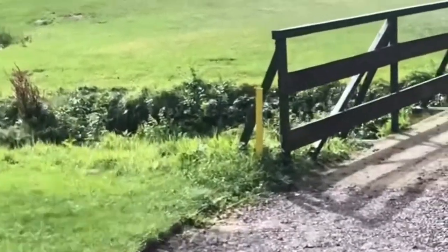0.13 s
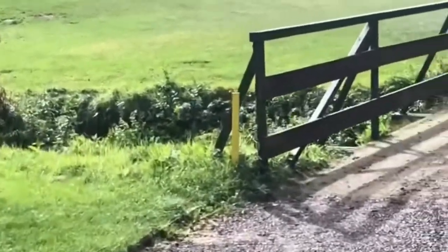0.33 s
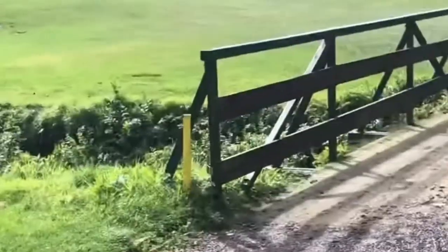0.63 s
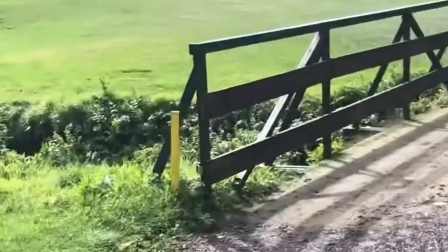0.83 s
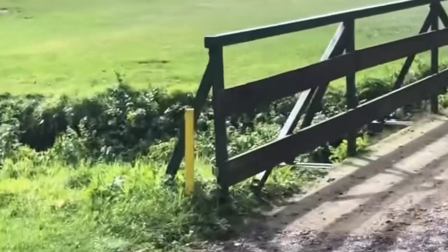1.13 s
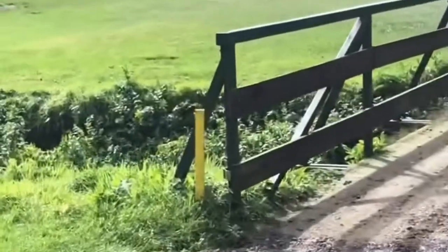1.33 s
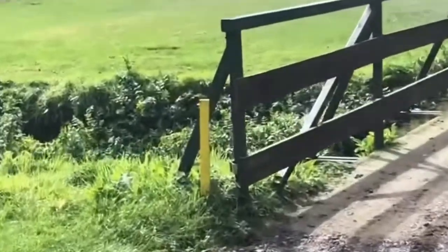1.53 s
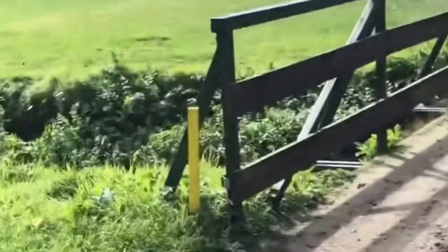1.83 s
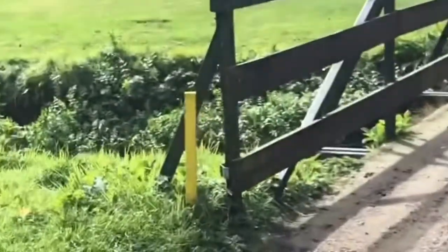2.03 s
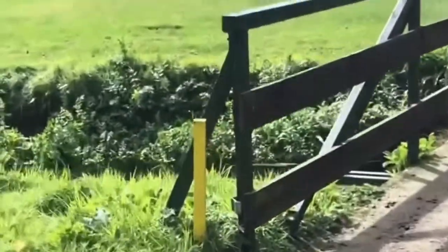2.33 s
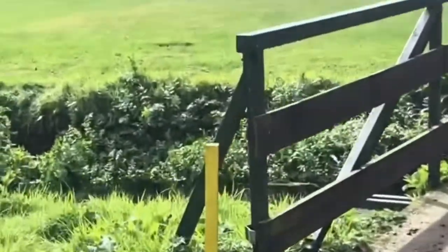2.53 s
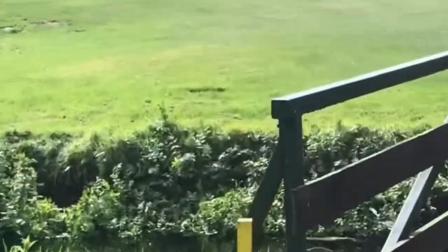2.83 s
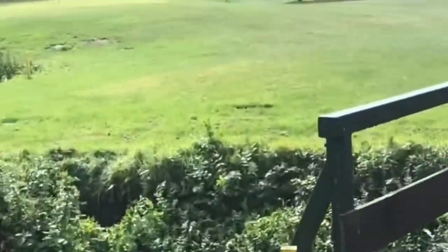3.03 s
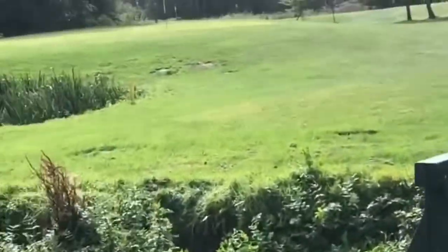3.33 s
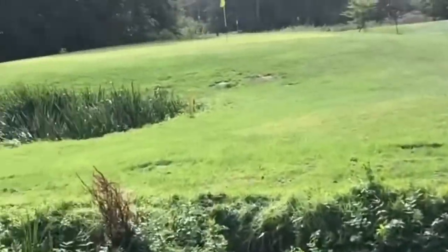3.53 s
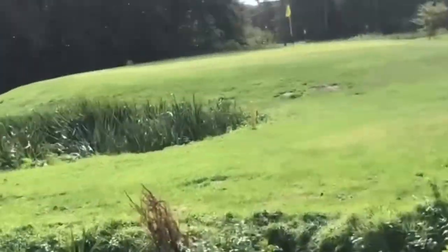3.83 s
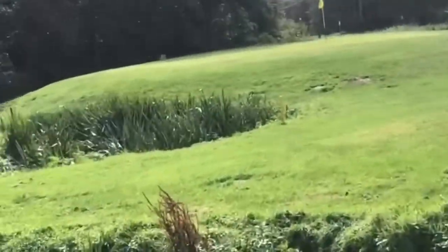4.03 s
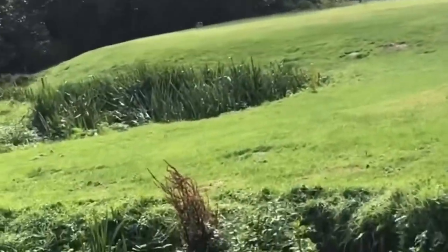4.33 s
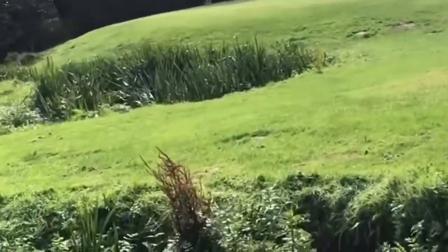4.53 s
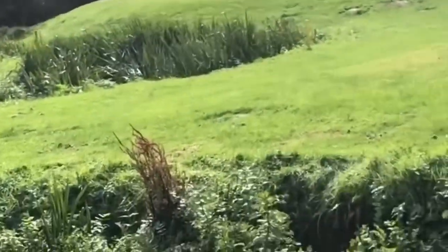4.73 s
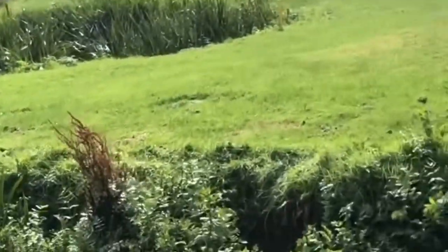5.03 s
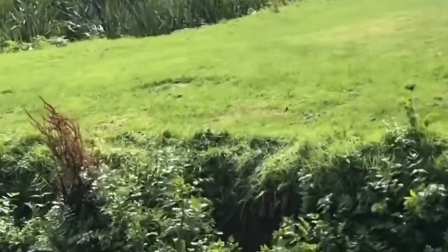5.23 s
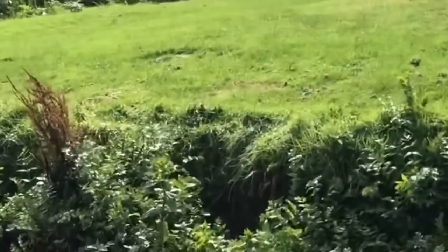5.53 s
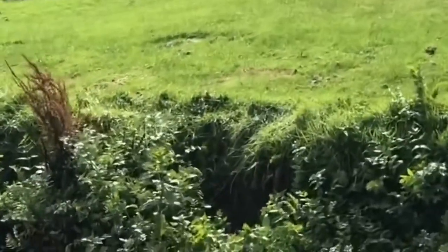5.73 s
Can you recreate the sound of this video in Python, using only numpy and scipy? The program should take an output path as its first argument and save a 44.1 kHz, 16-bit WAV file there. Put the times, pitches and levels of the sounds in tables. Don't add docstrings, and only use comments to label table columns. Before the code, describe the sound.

Outdoors on a gravel path beside grass, footsteps are heard close and dry through a handheld phone. From 0 to 0.7 s there are light scuffs, small clicks and soft sole thuds. Sharp stone cracks stand out around 0.8, 1.1 and 1.4 s, each with a bright snap and a little trickling grit. From 1.8 to 3.2 s the crunching becomes dense and loud, with overlapping snaps, scrapes and low heel knocks, peaking near 2.9 s together with a deep wind thump. From 3.3 to 4.1 s it thins to faint ticks and scuffs. A firm, heavy step lands around 4.2-4.4 s, another lighter cluster follows at 4.7-5.1 s, then only sparse clicks, one crisp crack at 5.6 s. Low rumble and handling bumps run throughout, strongest near 4.9 and 5.4-5.5 s, over a faint airy hiss with no obvious echo.

```python
import sys
import numpy as np
from scipy import signal
from scipy.fft import rfft, irfft, next_fast_len
from scipy.io import wavfile
from scipy.ndimage import uniform_filter1d

SR = 44100
rng = np.random.default_rng(int(sys.argv[2]) if len(sys.argv) > 2 else 0)


def attenuation_scalar(level_db):
    decades = np.asarray(level_db, float) / 20
    return 10 ** decades


def master_out(mix):
    frames = np.transpose(np.atleast_2d(mix))
    ceiling = np.clip(frames, -1, 1)
    pcm = np.round(ceiling * 32767).astype(np.int16)
    wavfile.write(sys.argv[1], SR, pcm)


N = 259431

# [f/Hz, width/Hz, level/dB]
DULL_RINGS = [(2423, 190, 9), (3700, 730, 8), (3130, 450, 0.5)]
# [f/Hz, width/Hz, level/dB]
BRIGHT_RINGS = [(5810, 840, 6.5), (7500, 260, 7.5), (8500, 2800, 8), (10000, 3500, 1.5),
                (13800, 3000, -7.5)]
# [f/Hz, width/Hz, level/dB]
SOLE_RINGS = [(918, 64, 8.5), (1140, 163, 8), (1630, 710, 1), (1838, 156, 7), (2220, 3350, -10),
              (687, 240, 1)]
CHIP_GRIT_DB, GRIND_GRIT_DB = -13, -9
HEEL_SCRAPE_DB = -16


def evened(x):
    return x / np.sqrt(np.mean(x ** 2) + 1e-20)


def column(table, count):
    rows = np.array(table, float)
    return np.interp(np.arange(N) / SR, rows[:, 0], rows[:, count])


def add(mix, s, sound):
    part = mix[round(s * SR):][:len(sound)]
    part += sound[:len(part)]


def ring(x, modes):
    out = np.zeros(len(x))
    for k, (hz, width, db) in enumerate(modes):
        b, a = signal.iirpeak(hz, hz / max(width, 10), SR)
        out += (-1) ** k * attenuation_scalar(db) * signal.lfilter(b, a, x)
    return out


def varied(modes, detune, spread_db):
    chance = rng.standard_normal((len(modes), 2))
    return [(hz * (1 + detune * u), width, db + spread_db * v)
            for (hz, width, db), (u, v) in zip(modes, chance)]


def struck_at(modes, hz, lift_db):
    near = np.argmin([abs(np.log(mode[0] / hz)) for mode in modes])
    struck = list(modes)
    _, width, db = modes[near]
    struck[near] = (hz, min(width, 0.14 * hz), db + lift_db)
    return struck


def coloured(points):
    f, db = np.transpose(points)
    size = next_fast_len(N)
    hz = np.fft.rfftfreq(size, 1 / SR)
    gain = attenuation_scalar(np.interp(np.log(hz + 1), np.log(f + 1), db))
    return evened(irfft(rfft(rng.standard_normal(size)) * gain, size)[:N])


def lumps(seconds):
    size = max(round(seconds * SR), 1)
    once = uniform_filter1d(rng.standard_normal(N), size)
    return evened(uniform_filter1d(once, size))


def slips(per_s, spread_db, decay_s):
    happens = rng.exponential(1, N), rng.random(N) < per_s / SR
    size = attenuation_scalar(spread_db * np.minimum(happens[0], 4)) * happens[1]
    energy = signal.lfilter([1], [1, -np.exp(-1 / (decay_s * SR))], size ** 2)
    return evened(np.sqrt(energy))


def snap(db, hz, bright_db, grit_db, second_hz):
    t = np.arange(2200) / SR
    crack, grit, flicker = rng.standard_normal((3, len(t)))
    crack = .36 * crack * np.exp(-t / .001)
    crack[8] += 1.8
    trickle = attenuation_scalar(2.7 * evened(uniform_filter1d(flicker, size=60)))
    trickle = trickle * np.exp(-t / 0.0065) * np.minimum(t / 0.002, 1)

    rings = varied(DULL_RINGS + BRIGHT_RINGS, detune=0.039, spread_db=2.5 if second_hz else 4.0)
    rings = struck_at(rings, hz, lift_db=11.5)
    if second_hz:
        rings = struck_at(rings, second_hz, lift_db=9.0)

    def sounded(modes, lag, power):
        struck = ring(np.roll(crack, lag), modes)
        struck = struck / np.sqrt(np.mean(struck[:110] ** 2))
        return np.sqrt(power) * (struck + attenuation_scalar(grit_db + 7.5) * trickle * evened(ring(grit, modes)))

    share = 1 / (1 + attenuation_scalar(-2 * bright_db))
    dull = sounded(rings[:len(DULL_RINGS)], 14, 1 - share)
    bright = sounded(rings[len(DULL_RINGS):], 0, share)
    rubbed = attenuation_scalar(grit_db + 5.5) * trickle * evened(ring(grit, SOLE_RINGS))
    return attenuation_scalar(db - 7.0) * (bright - dull + rubbed)


def stone(out_db, hz, grit_db):
    bright_db = 7.5 * np.log2(hz / 4140)
    return snap(out_db, hz, bright_db, grit_db, None)


def knock(db, hz, scrape_db, length):
    t = np.arange(round((length + .05) * SR)) / SR
    release = np.exp(-np.maximum(t - 0.45 * length, 0) / (0.0039 + 0.56 * length))
    press = np.minimum(t / 0.0011, 1) * release
    shove, rub = rng.standard_normal((2, len(t))) * press
    contact = round(.002 * SR)
    shove[contact] += 18
    rub[contact] += 8
    push = ring(ring(shove, [(hz, 100, 0)]), [(hz, 260, 0)])
    scrape = ring(rub, varied(SOLE_RINGS, detune=0.0043, spread_db=2.0))
    loud = t < length + .004
    push = push / np.sqrt(np.mean(push[loud] ** 2))
    scrape = scrape / np.sqrt(np.mean(scrape[loud] ** 2))
    share = 1 / (1 + attenuation_scalar(-2 * scrape_db))
    return attenuation_scalar(db - 8.0) * (np.sqrt(1 - share) * push + np.sqrt(share) * scrape)


def rustle(db, hz, length):
    t = np.arange(round((length + 0.024) * SR)) / SR
    spray = np.minimum(t / 0.0015, 1) * np.exp(-np.maximum(t - length, 0) / 0.0045)
    rings = struck_at(SOLE_RINGS + DULL_RINGS + BRIGHT_RINGS, hz, lift_db=12.0)
    return attenuation_scalar(db - 3.5) * spray * evened(ring(rng.standard_normal(len(t)), rings))


def nudge(db, hz, length):
    t = np.arange(round((length + 0.036) * SR)) / SR
    press = np.minimum(t / 0.003, 1) * np.exp(-np.maximum(t - length / 2, 0) / (0.0023 + length / 2))
    rub = rng.standard_normal(len(t)) * press
    rub[round(.001 * SR)] += 8
    rung = ring(rub, struck_at(SOLE_RINGS, hz, lift_db=13.0))
    return attenuation_scalar(db - 7.5) * rung / np.sqrt(np.mean(rung[t < length + .002] ** 2))


def steps():
    # [t/s, level/dB, strongest f/Hz, second f/Hz, grit level/dB]
    cracks = [(0.191, -16, 7250, 8900, -28), (0.7973, -7, 3500, 8650, -26), (1.1419, -6.5, 5400, 2500, -29),
              (1.366, -1.5, 3720, 5940, -28), (1.832, -13, 3830, 8600, -16),
              (1.8552, -9.5, 2560, 10600, -15), (1.89, -8, 3700, 5900, -30), (2.0402, -16, 7500, 2170, -25),
              (2.19, -19.5, 5800, 3700, -7.5), (2.215, -11, 8600, 2470, -22),
              (2.2214, -9.5, 3640, 2540, -24), (2.3038, -2.5, 5080, 8600, -30),
              (2.3244, -10.5, 3840, 4900, -15.5), (2.3605, -9, 3400, 11300, -11),
              (2.5576, -2, 3700, 8240, -23), (2.633, -20.5, 1880, 5900, -5.5),
              (2.8057, -6, 3730, 4960, -13.5), (2.854, -5.5, 5700, 7500, -22),
              (2.887, -0.5, 8330, 2500, -26), (2.8978, -1, 7150, 2540, -27),
              (2.991, -11.5, 2430, 3520, -18), (3.022, -12, 3600, 8600, -24), (3.066, -2, 5160, 3630, -28),
              (3.128, -15, 3540, 5800, -18), (3.2194, -15, 3680, 8200, -11), (4.3991, -7, 8500, 3180, -18),
              (4.863, -9.5, 2460, 3280, -23), (5.0296, -11, 3320, 8000, -17.5),
              (5.0416, -11, 3650, 3080, -22), (5.6003, -6.5, 3680, 5260, -19.5)]
    crack_bright = [18, 1.5, 4.5, -4, -1, 3.5, -2, 10, 4, -6, -8, 8.5, -3, 2, 1, 3, -4, 7, 5, 7.5, -8, -5,
                    3, -2, -1, 1.5, 1, -2, -13, -6.5]
    # [t/s, level/dB, strongest f/Hz]
    chips = [(0.0645, -18, 8000), (0.2244, -28, 4870), (0.3148, -18.5, 7950), (0.4365, -24.5, 6040),
             (0.535, -16.5, 8100), (0.7348, -23, 3700), (0.888, -20, 11400), (1.012, -21, 6900),
             (1.039, -24.5, 3250), (1.1759, -23.5, 9200), (1.4147, -20, 7494), (1.5757, -28.5, 6030),
             (1.8804, -23, 7280), (2.025, -18.5, 7000), (2.818, -14, 7150), (2.8815, -22, 8100),
             (3.0804, -17, 3400), (3.149, -24, 8600), (3.343, -17.5, 5750), (3.7018, -26, 9250),
             (3.7552, -20, 3400), (3.9128, -20, 8700), (4.1874, -21.5, 2030), (4.2117, -18, 3600),
             (4.254, -20.5, 3260), (4.5772, -17, 7370), (4.8312, -16.5, 3720), (4.8703, -18.5, 8500),
             (5.0689, -18, 3600), (5.2231, -21.5, 2580)]
    # [t/s, level/dB, strongest f/Hz]
    strays = [(0.219, -22, 8000), (0.257, -29.5, 5460), (0.289, -49, 6460), (0.69, -36, 7500),
              (0.705, -34, 6460), (1.501, -25, 8500), (1.645, -29, 7500), (1.698, -34, 7500),
              (2.0368, -20, 6340), (2.418, -40, 7500), (3.0325, -17, 3520), (3.957, -25.5, 3600),
              (4.155, -40, 7000), (4.4045, -14, 3200), (5.355, -28, 6540), (5.377, -35, 8000),
              (5.65, -31, 7500)]
    # [t/s, level/dB, strongest f/Hz]
    grinds = [(0.0242, -28, 8500), (0.0384, -21, 8700), (0.1366, -19, 7540), (0.178, -18.5, 2700),
              (0.3448, -22, 2030), (0.5273, -25.5, 6600), (0.6349, -19.5, 7050), (0.8584, -24, 6360),
              (1.0006, -24, 1870), (1.092, -19.5, 3480), (1.4916, -22, 2920), (1.805, -20, 6050),
              (1.986, -18, 7900), (2.0012, -22.5, 2400), (2.1422, -24, 5760), (2.3394, -18, 3670),
              (2.4864, -21, 8100), (2.7129, -16, 6900), (2.9162, -15, 8150), (3.0409, -17.5, 3200),
              (3.3246, -35, 8500), (3.4061, -27.5, 3770), (3.4344, -26, 3630), (3.645, -25, 7100),
              (3.845, -30.5, 3320), (4.015, -24.5, 5860), (4.3479, -17, 7700), (4.8236, -22.5, 3650),
              (5.1495, -22.5, 6800), (5.735, -24, 2780)]
    # [t/s, level/dB, centre f/Hz, length/s]
    rustles = [(0.146, -25, 4140, 0.0021), (0.604, -25.5, 4200, 0.0016), (1.199, -28, 10000, 0.0058),
               (1.212, -34, 6500, 0.00072), (1.275, -28, 3400, 0.0012), (1.374, -24, 3800, 0.0014),
               (1.435, -30, 3740, 0.001), (1.466, -29.5, 8500, 0.0013), (1.717, -27.5, 8070, 0.004),
               (1.75, -28.5, 8150, 0.0022), (1.782, -29, 7100, 0.0046), (2.106, -28.5, 8500, 0.0067),
               (2.113, -24.5, 7920, 0.004), (2.303, -41, 2200, 0.0032), (2.372, -25, 6260, 0.0046),
               (2.451, -31, 2200, 0.017), (2.466, -24, 3550, 0.0013), (2.516, -29, 3800, 0.0092),
               (2.568, -24, 3600, 0.0038), (2.599, -26.5, 2200, 0.007), (2.622, -23.5, 7960, 0.0082),
               (2.775, -26, 2130, 0.0027), (3.208, -23, 7830, 0.0046), (3.353, -44, 5100, 0.0019),
               (3.947, -33, 5030, 0.0018), (4.302, -27, 1960, 0.0051), (4.359, -29, 2220, 0.019),
               (4.755, -29, 5170, 0.0015), (4.873, -42, 8400, 0.0014), (4.937, -27.5, 2180, 0.0082)]
    # [t/s, level/dB, knock f/Hz, length/s]
    thuds = [(0.017, -27.5, 268, 0.063), (0.104, -24.5, 317, 0.012), (0.604, -26, 400, 0.04),
             (0.618, -22.5, 190, 0.02), (0.681, -21.5, 273, 0.012), (0.765, -25.5, 377, 0.014),
             (0.831, -21.5, 370, 0.022), (1.043, -20.5, 396, 0.0079), (2.021, -23.5, 287, 0.026),
             (2.369, -18.5, 208, 0.014), (2.829, -13, 256, 0.0066), (3.402, -21.5, 312, 0.012),
             (3.978, -17, 366, 0.0074), (4.195, -24, 420, 0.038), (4.251, -16, 370, .0097),
             (4.356, -10, 264, 0.011), (4.389, -20.5, 246, 0.019), (4.738, -23.5, 205, 0.022),
             (4.909, -18, 260, 0.0089), (5.475, -27, 239, 0.029)]
    # [t/s, level/dB, knock f/Hz, length/s]
    heels = [
        (0.385, -20, 370, 0.0067),
        (1.754, -20.5, 294, 0.0065),
        (1.853, -23, 240, 0.038),
        (2.717, -27, 367, 0.0079),
        (2.891, -22, 193, 0.036),
        (2.909, -16, 184, 0.017),
        (3.593, -27.5, 367, 0.014),
        (5.493, -18.5, 192, 0.0098),
    ]
    # [t/s, level/dB, length/s]
    scrapes = [(0.123, -22.5, 0.027), (0.441, -43, 0.0092), (0.524, -28.5, 0.033), (1.377, -23, 0.0092),
               (1.788, -21, 0.013), (1.826, -26, 0.043), (1.925, -27.5, 0.012), (2.232, -23, 0.0089),
               (2.509, -34, 0.038), (2.592, -22.5, 0.041), (2.772, -21.5, .011), (2.813, -18, 0.017),
               (3.128, -26.5, 0.024), (3.217, -21.5, .015), (4.012, -25, 0.013), (4.068, -26, 0.014),
               (4.297, -21.5, 0.012), (4.573, -25.5, 0.0084), (4.691, -24.5, 0.025), (4.823, -19.5, .011),
               (5.272, -44, 0.021)]

    out = np.zeros(N)
    for (s, db, hz, second_hz, grit_db), bright_db in zip(cracks, crack_bright):
        late, weak = rng.random(2)
        add(out, s - .0005, snap(db, hz, bright_db, grit_db, second_hz))
        rebound = stone(db - 21 - 6 * weak, 3400, -13)
        add(out, s + 0.005 * (1.1 + 0.73 * late), rebound)
    for table, grit_db in ((chips, CHIP_GRIT_DB), (strays, CHIP_GRIT_DB), (grinds, GRIND_GRIT_DB)):
        for s, db, hz in table:
            add(out, s - .0003, stone(db, hz, grit_db))
    for s, *row in rustles:
        add(out, s, rustle(*row))
    for table, scrape_db in ((thuds, -5.5), (heels, HEEL_SCRAPE_DB)):
        for s, db, hz, length in table:
            add(out, s - .002, knock(db, hz, scrape_db, length))
    for s, db, length in scrapes:
        add(out, s - .002, knock(db, hz=273, scrape_db=6, length=length))
    return out


def pebbles():
    # [t/s, level/dB, strongest f/Hz]
    pebble_ticks = [(0.0248, -21, 8500), (0.1257, -16, 7600), (0.201, -27, 4640), (0.287, -30, 8480),
                    (0.3817, -28, 3340), (0.403, -40, 2450), (0.4865, -25, 6500), (0.627, -22, 1960),
                    (0.6708, -23.5, 2000), (0.7018, -25, 7660), (0.758, -25, 1810), (0.8006, -24, 2430),
                    (0.8145, -35, 3600), (1.0686, -23.5, 7360), (1.1453, -14.5, 3100), (1.211, -22, 6290),
                    (1.3793, -29, 3820), (1.4348, -23, 3680), (1.767, -26, 2670), (1.801, -22, 5580),
                    (1.829, -25, 1810), (1.88, -29, 7240), (1.9796, -24, 3800), (1.9842, -22, 3290),
                    (2.1645, -19, 2000), (2.1843, -20, 3400), (2.1903, -15, 5810), (2.2217, -10, 3630),
                    (2.2372, -13.5, 1910), (2.289, -26, 2000), (2.3603, -13, 3100), (2.448, -19, 1850),
                    (2.4703, -28, 8000), (2.5424, -22, 2560), (2.633, -20, 1810), (2.702, -30, 2500),
                    (2.709, -23, 2550), (2.7435, -24, 2580), (2.8726, -29, 6090), (2.9958, -16, 2390),
                    (3.038, -24, 3400), (3.077, -20, 2710), (3.1178, -23, 3450), (3.1334, -29, 3080),
                    (3.1986, -17.5, 1820), (3.2946, -29, 1800), (3.298, -21, 1820), (3.3257, -20.5, 6090),
                    (3.3578, -34, 2000), (3.639, -25.5, 1740), (3.7663, -22.5, 3680), (4.3132, -34, 1870),
                    (4.338, -29, 3400), (4.7151, -33, 2050), (4.8779, -31, 8160), (5.0026, -31, 4840),
                    (5.0345, -21, 3230), (5.1406, -27, 7490), (5.3743, -36, 8030), (5.4885, -26, 1840)]
    # [t/s of the peak, level/dB, sole f/Hz]
    nudges = [(0.039, -28, 1140), (0.4415, -25, 583), (0.4874, -29, 970), (0.6695, -30, 960),
              (1.1048, -29, 520), (1.171, -28.5, 510), (1.7179, -29, 700), (2.0396, -22, 886),
              (2.1, -26, 1160), (2.1152, -28, 1120), (2.4536, -21.5, 1120), (2.8303, -17, 1230),
              (3.202, -24.5, 1790), (3.295, -24, 1724), (3.3584, -32, 540), (3.635, -27.5, 860),
              (3.7185, -28, 510), (4.4423, -29, 900), (4.49, -27, 1200), (4.6105, -29.5, 1120),
              (4.7155, -25, 1190), (4.8304, -16.5, 1530), (4.9416, -21.5, 1770), (5.27, -28.5, 880),
              (5.3325, -28, 650)]
    # [t/s, level/dB, sole f/Hz, length/s]
    slaps = [(0.94, -23.5, 810, 0.0026), (1.003, -28, 1850, .008), (1.187, -30.5, 1860, 0.019),
             (2.806, -16, 1240, 0.0073), (4.683, -22.5, 1200, 0.0039), (4.2, -29, 870, .006),
             (5.651, -34.5, 1570, 0.0089), (5.83, -34, 1600, .005), (4.357, -22, 2700, 0.02),
             (2.51, -29, 1830, 0.021), (.86, -29, 970, 0.0082), (1.7, -29.5, 1140, 0.0056),
             (2.141, -32, 1150, 0.0089), (2.436, -28, 1150, 0.0067), (2.9, -27, 1300, .008),
             (3.739, -29, 1400, .006), (5.31, -32.5, 850, 0.0066), (4.3575, -18.5, 996, 0.0058)]
    # [t/s, level/dB, strongest f/Hz]
    more_grinds = [
        (.05, -24, 3000),
        (.873, -29, 7500),
        (1.846, -22, 3000),
        (1.97, -30, 3300),
        (2.349, -24, 3500),
        (2.51, -25, 8030),
        (2.859, -21, 2500),
        (3.048, -23, 3300),
        (4.796, -29, 7000),
    ]
    # [t/s, level/dB, knock f/Hz, length/s]
    more_heels = [
        (0.709, -27, 300, .012),
        (0.775, -24.5, 348, 0.0087),
        (2.841, -19, 250, 0.011),
        (3.464, -28.5, 380, .008),
        (4.267, -22, 300, .014),
        (4.404, -21, 250, .014),
    ]

    out = np.zeros(N)
    for s, db, hz in pebble_ticks:
        add(out, s - .0003, stone(db - 1.0, hz, grit_db=-12))
    for s, db, hz in nudges:
        add(out, s - .002, nudge(db, hz, length=0.0027))
    for s, *row in slaps:
        add(out, s - .001, nudge(*row))
    for s, db, hz in more_grinds:
        add(out, s - .0003, stone(db, hz, GRIND_GRIT_DB))
    for s, db, hz, length in more_heels:
        add(out, s - .002, knock(db, hz, HEEL_SCRAPE_DB, length))
    return out


def ticks(per_s, count):
    out = np.zeros(N)
    for hz in np.geomspace(1200, 9500, count):
        clicks = slips(per_s / count, spread_db=3.5, decay_s=0.0006) * rng.standard_normal(N)
        out += ring(clicks, [(hz, 0.09 * hz, 0)])
    return evened(out)


def tread():
    # [t/s, level/dB]
    weight = [(0, 7.5), (.1, -3.5), (.8, 0.5), (1.3, -0.5), (1.6, -4), (1.85, -1), (2.34, 2.5), (2.86, 3),
              (3.3, 1), (3.6, -2), (4.1, -5), (4.22, 3), (4.4, 7.5), (4.62, -5.5), (4.88, 4.5), (5.3, -3.5),
              (5.5, 0.5), (5.68, -8.5), (5.88, -5.5)]
    # [f/Hz, width/Hz, level/dB]
    ground_rings = [(245.5, 40, 6.1), (400, 122, 1.1)]

    fine = slips(400, spread_db=5, decay_s=.0025)
    coarse = slips(150, spread_db=4.2, decay_s=.004)
    heavy = slips(90, spread_db=2.2, decay_s=.012)
    a, b, c = rng.standard_normal((3, N))
    grit = evened(ring(a * (fine + 0.19 * coarse), DULL_RINGS + BRIGHT_RINGS))
    grit = grit + attenuation_scalar(4.5) * ticks(700, count=12)
    scuff = evened(ring(b * (coarse + 3.6 * fine + 0.047 * heavy), SOLE_RINGS))
    push = evened(ring(c * (heavy + 0.17 * coarse), ground_rings))
    weight_db = column(weight, count=1)
    out = attenuation_scalar(-52.5 + 0.77 * weight_db) * grit
    out += attenuation_scalar(-41.5 + weight_db) * scuff
    out += attenuation_scalar(-43 + 0.91 * weight_db) * push
    return out


def bump(db, hz):
    t = np.arange(-.06, .08, 1 / SR)
    swell = np.exp(-(t * hz / np.where(t < 0, .9, 1.4)) ** 2)
    return attenuation_scalar(db - 3.5) * swell * np.cos(2 * np.pi * (hz * t * (1 - 6.1 * t) + rng.random()))


def wind():
    # [t/s, level/dB]
    gusts = [(0, -44), (.5, -45.5), (1.21, -49), (1.57, -43), (2.18, -45), (2.77, -43), (2.9, -33),
             (3.1, -43), (4.11, -42.5), (4.31, -35), (4.72, -42.5), (4.97, -31), (5.31, -38), (5.45, -28),
             (5.7, -42.5), (5.88, -47)]
    # [f/Hz, level/dB]
    rumble_spectrum = [(8.8, -45), (15, -21), (46, -0.5), (64, -0.5), (84, 1.5), (119, -6.5), (160, -46),
                       (210, -11.5), (350, -120)]
    # [t/s of the peak, level/dB, half length/s]
    flutters = [
        (2.903, -30.5, 0.088),
        (4.313, -41, 0.11),
        (4.987, -39.5, 0.1),
        (5.456, -31.5, 0.096),
    ]
    # [t/s of the peak, level/dB, swing f/Hz]
    bumps = [(0.415, -25.5, 55.5), (0.557, -25, 75), (0.66, -30, 51), (1.447, -22, 57),
             (1.517, -23.5, 71.4), (1.658, -22, 66), (1.877, -27, 85.4), (2.49, -19, 73), (2.853, -31, 75),
             (2.906, -10.5, 84.6), (2.98, -18, 92.5), (3.509, -34, 78), (3.674, -26.5, 89),
             (3.775, -27, 74.6), (4.175, -24, 67.7), (4.299, -23, 104), (4.411, -23, 61),
             (4.485, -21.5, 83.5), (4.911, -11, 67), (5.098, -19, 56.5), (5.336, -22, 68.6),
             (5.437, -11, 126), (5.512, -12.5, 54), (5.505, -15, 155), (1.375, -33, 60), (2.076, -35, 67),
             (2.462, -18.5, 80), (2.545, -25.5, 90.5), (3.381, -30, 62), (3.62, -30, 55), (3.87, -29, 60),
             (.392, -26.5, 170), (4.791, -26, 60), (5.82, -28, 60), (3.42, -32, 150), (5.055, -24, 65),
             (4.94, -15.5, 80.4), (5.125, -25, 74.6), (5.395, -17.5, 110), (5.179, -25, 69.3)]

    rumble = coloured(rumble_spectrum) * attenuation_scalar(1.3 * lumps(0.07))
    flutter = ring(ring(rng.standard_normal(N), [(148, 133, 0)]), [(140, 135, 0)])
    flutter = flutter * attenuation_scalar(1.8 * lumps(0.014))
    t = np.arange(N) / SR
    gust = attenuation_scalar(column(gusts, count=1))
    hard = sum(attenuation_scalar(db) * np.exp(-((t - s) / half) ** 2) for s, db, half in flutters)
    out = gust * evened(rumble) + (gust * attenuation_scalar(-7) + hard) * evened(flutter)
    for s, *row in bumps:
        add(out, s - .06, bump(*row))
    return out


def air():
    # [f/Hz, level/dB]
    hiss_spectrum = [(59, -38), (100, 8.5), (267, -11.5), (577, -2), (1170, -9), (2800, -21.5), (8690, -14),
                     (15100, -30), (16500, -53)]
    return attenuation_scalar(-42.5 - 6.5) * coloured(hiss_spectrum) * attenuation_scalar(2.6 * lumps(0.03))


def scene():
    return (steps() + pebbles() + tread() + wind() + air())[None]


def low_pass(x):
    return signal.sosfilt(signal.butter(12, 16810, fs=SR, output="sos"), x)


def record(dry):
    # [f/Hz, level/dB]
    treble_response = [(10500, -0.5), (12200, -3), (13500, -18), (14800, -5.5), (15900, -17), (16400, -28)]
    hz, db = np.transpose(treble_response)
    treble_fir = signal.firwin2(255, np.r_[0, hz, hz[-1] + 500, SR / 2], np.r_[1, attenuation_scalar(db), 0, 0], fs=SR)
    overloaded = .8 * np.tanh(dry / .8)
    heard = signal.oaconvolve(overloaded, treble_fir[None], "same")
    return low_pass(heard)


dry = scene()
out = record(dry)
master_out(out)
```